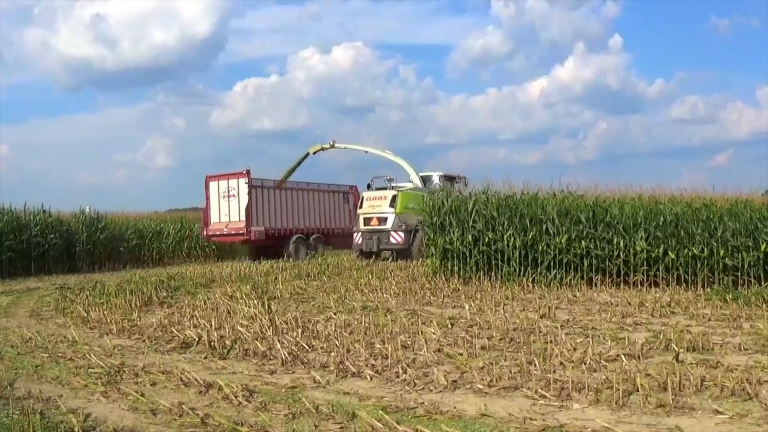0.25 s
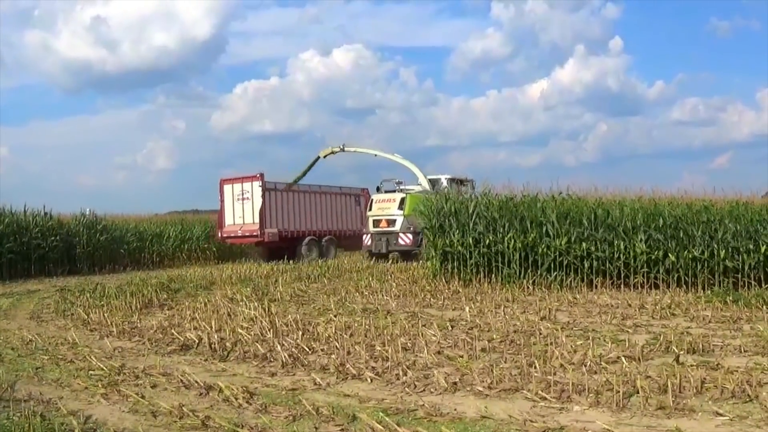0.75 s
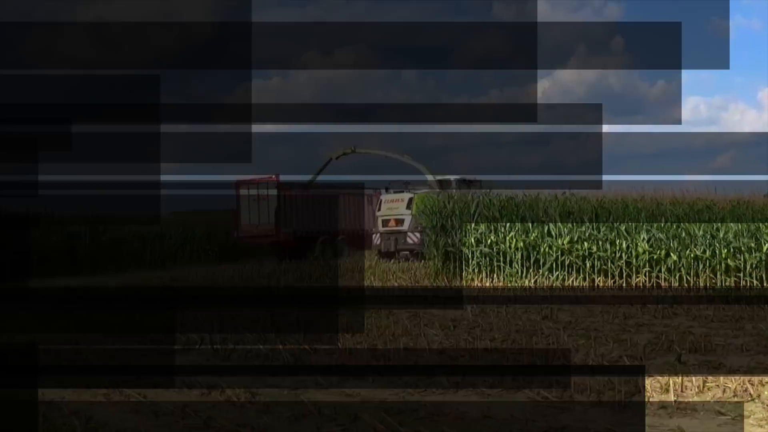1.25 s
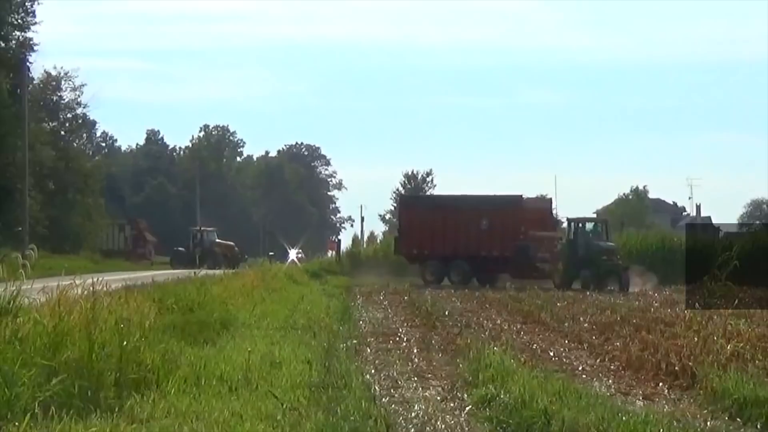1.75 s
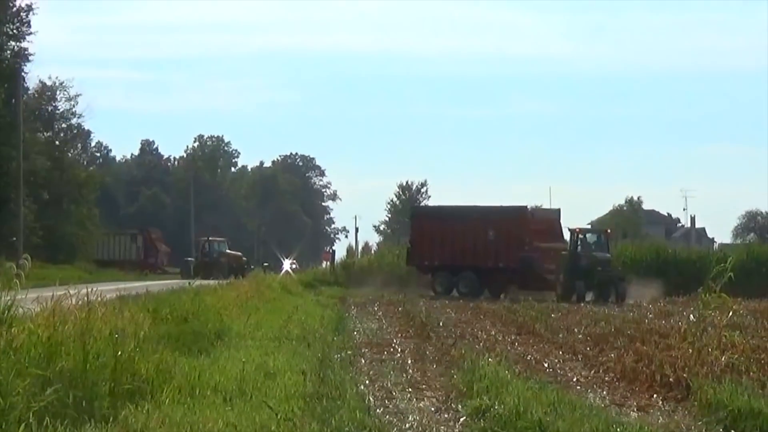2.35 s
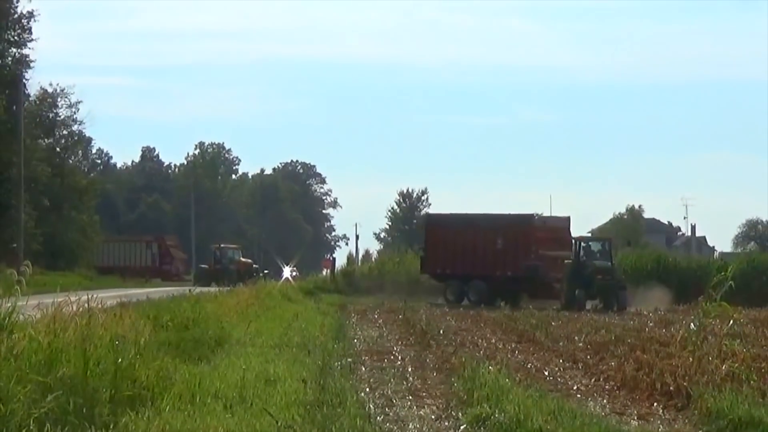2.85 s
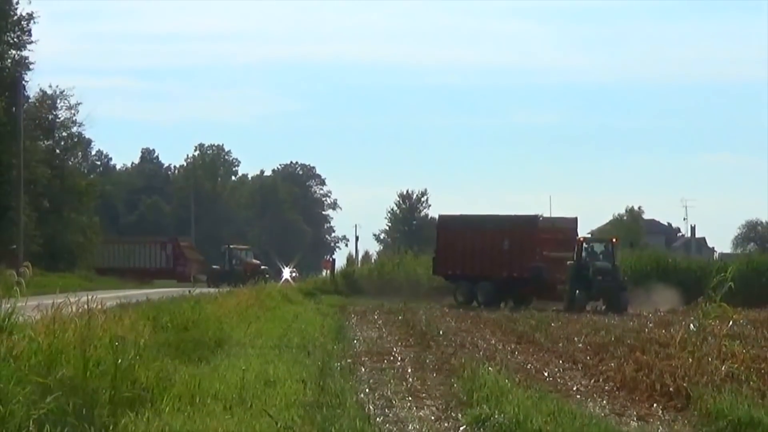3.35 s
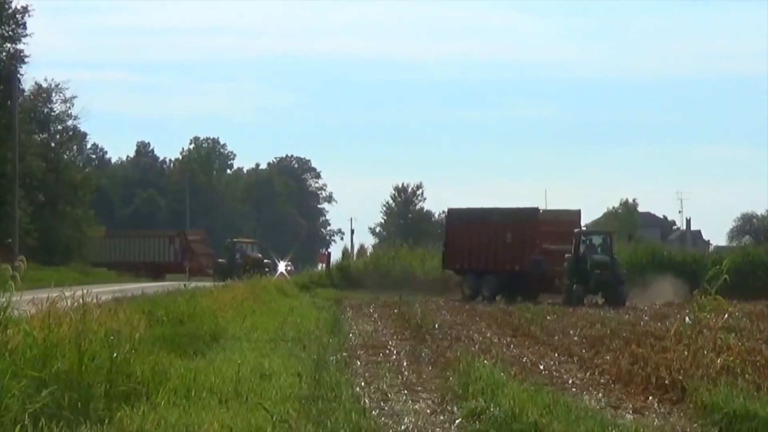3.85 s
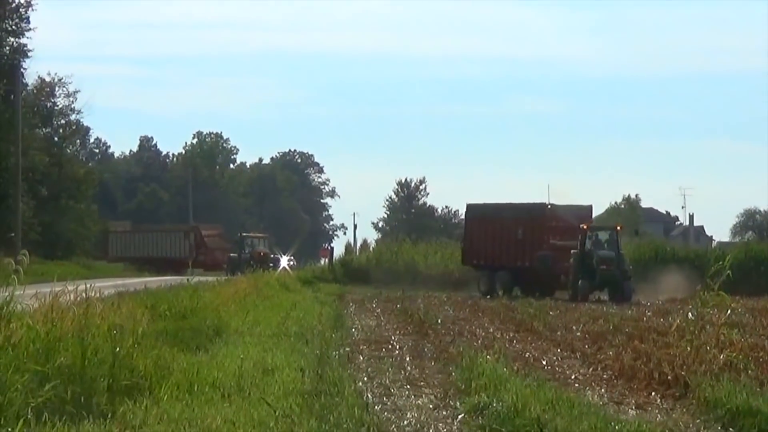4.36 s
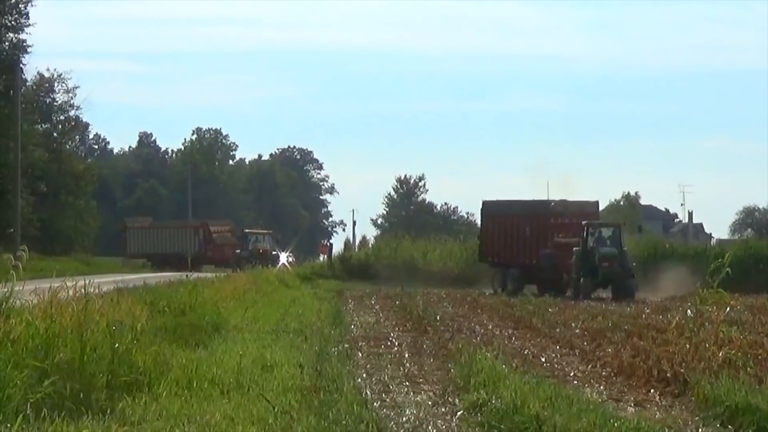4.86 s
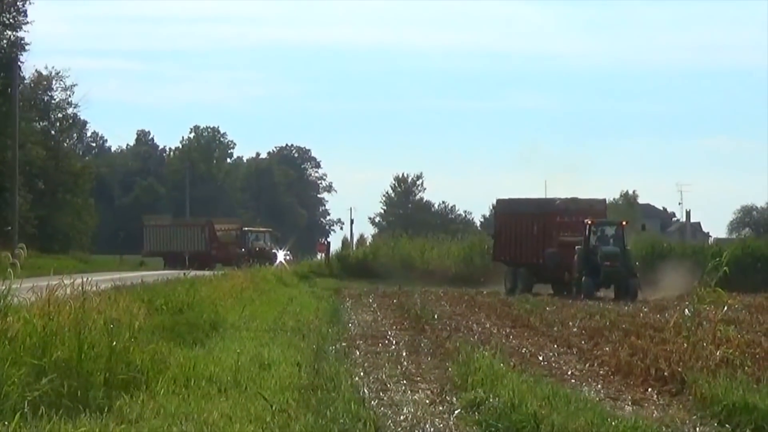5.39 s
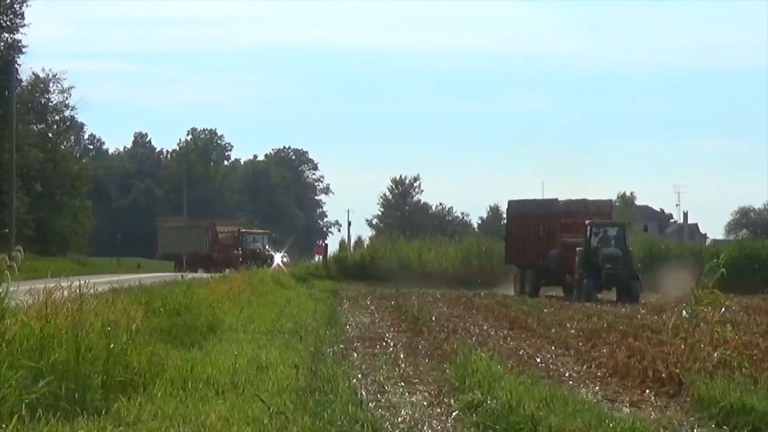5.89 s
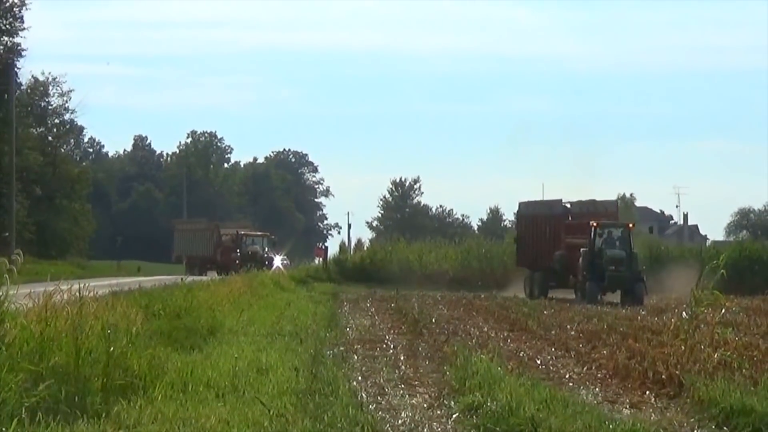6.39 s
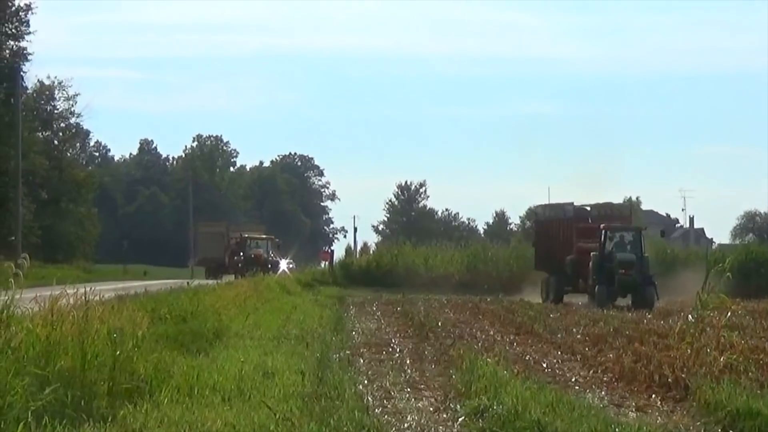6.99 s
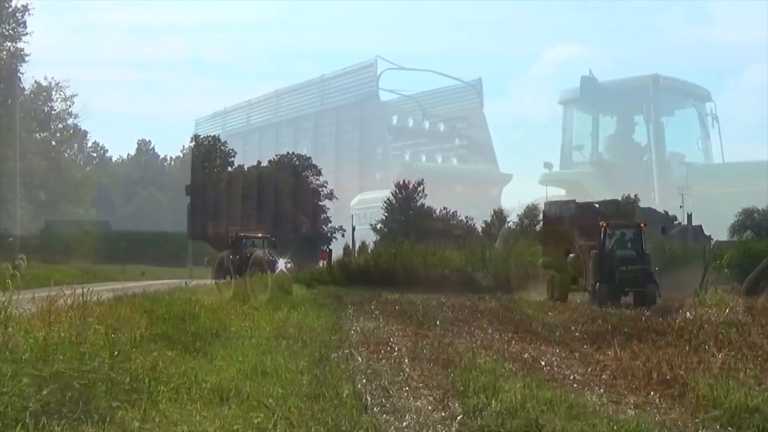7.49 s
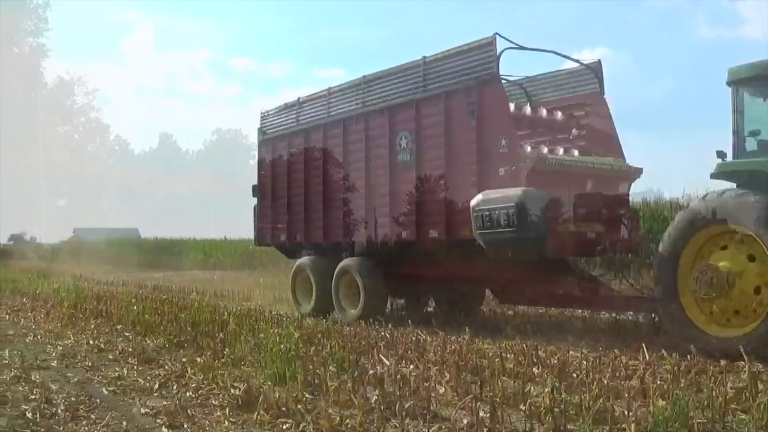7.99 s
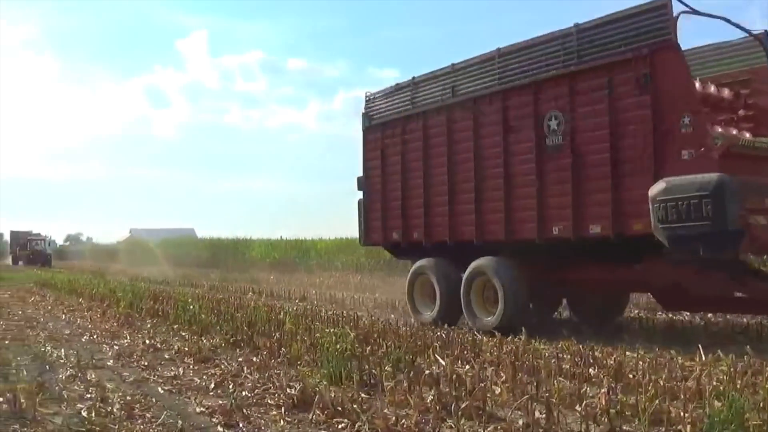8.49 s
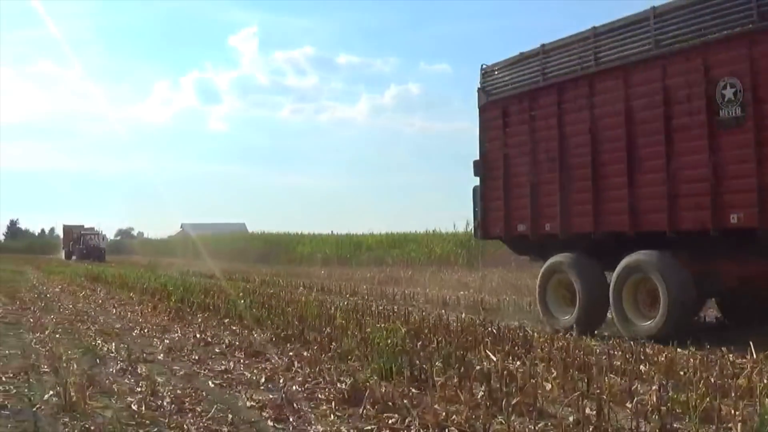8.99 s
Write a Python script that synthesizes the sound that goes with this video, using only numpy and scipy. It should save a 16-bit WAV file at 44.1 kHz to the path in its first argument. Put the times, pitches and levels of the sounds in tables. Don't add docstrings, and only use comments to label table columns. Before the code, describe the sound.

Loud chopping machine in a field, then far engines, buzzing insects and clanking wagons, finally a near tractor passing with a squeaking, rattling wagon.

```python
import sys
import numpy as np
from scipy import signal
from scipy.io import wavfile
from scipy.ndimage import uniform_filter1d

SR = 44100
rng = np.random.default_rng(int(sys.argv[2]) if len(sys.argv) > 2 else 0)


def inscribe(sig):
    pcm = np.round(np.clip(np.atleast_2d(sig).T, -1, 1) * 32767)
    wavfile.write(sys.argv[1], SR, pcm.astype(np.int16))


def gain_from_db(level_db):
    decades = np.asarray(level_db, float) / 20
    return 10 ** decades


N = 407484


def evened(x):
    return x / np.sqrt(np.mean(x ** 2) + 1e-20)


def between(ends, share):
    return ends[0] + (ends[1] - ends[0]) * share


def read(points, hz):
    f, value = np.transpose(points)
    return np.interp(np.log(hz + 1), np.log(f + 1), value)


def unroll(rows, t):
    s, *columns = np.transpose(rows)
    return [np.interp(t, s, column) for column in columns]


def add(mix, s, sound):
    part = mix[..., round(s * SR):][..., :sound.shape[-1]]
    part += sound[..., :part.shape[-1]]


def drift(size, span):
    wander = uniform_filter1d(rng.standard_normal(size), int(span), mode="wrap")
    return evened(uniform_filter1d(wander, int(span), mode="wrap"))


def stereo_noise(size, spread):
    noise = rng.standard_normal((3, size))
    return noise[0] + spread * noise[1:]


def resonate(x, hz, width):
    turn = np.exp(2j * np.pi * np.cumsum(hz * np.ones(x.shape[-1])) / SR)
    r = np.exp(-np.pi * width / SR)
    return 2 * (turn * signal.lfilter([1 - r], [1, -r], x / turn + 1e-18)).real


def ring_twice(x, hz, width, hz_2, width_2):
    return evened(resonate(resonate(x, hz, width), hz_2, width_2))


def tones(hz, multiples, levels, share, effort_db=0, waver=0.0023, flutter_db=0.5):
    turns = np.cumsum(hz * (1 + waver * drift(len(hz), 1800))) / SR
    total = np.zeros(len(hz))
    for k, db in zip(multiples, levels):
        level_db = between(db, share) + effort_db + flutter_db * drift(len(hz), 1150)
        total += np.sqrt(2) * gain_from_db(level_db) * np.sin(2 * np.pi * (k * turns + rng.random()))
    return total


def strokes(t, rate_hz, sharp, group=1, accent=0.):
    turns = np.cumsum(rate_hz * (1 + 0.0326 * drift(len(t), 6060))) / SR
    puffs = np.exp(sharp * np.cos(2 * np.pi * turns))
    return turns, puffs * (1 + accent * np.cos(2 * np.pi * turns / group))


def wide(x, width, lean_db=0):
    return gain_from_db(np.outer([.5, -.5], lean_db)) * (x + np.outer([width, -width], np.roll(x, 310)))


# f/Hz, likeness 0-1
SAME = [
    [(60, 0.89), (220, 0.8), (830, 0.83), (3110, 0.86), (11600, 0.92)],
    [(60, 1), (220, 0.99), (830, 0.91), (3110, 0.92), (11600, 0.91)],
    [(60, 0.98), (220, 0.76), (830, 0.64), (3110, 0.77), (11600, 0.47)],
]
# f/Hz, level/dB
LEAN = [
    [(60, -1.0), (220, -0.035), (830, 1.0), (3110, -0.4), (11600, 0.53)],
    [(60, 0.0), (220, -0.22), (830, 1), (3110, -1.9), (11600, 1.0)],
    [(60, 13), (220, -7), (830, -9.5), (3110, -10.5), (11600, -1)],
]
# f/Hz, phase/radians
LEAD = [(60, 0.081), (260, -0.31), (1500, 0.0071), (3500, -0.079), (6000, 0.21)]


def roar(level_db, treble_db, blend, colour_a, colour_b, view, panels=(), panel_db=5,
         patchy_db=1.5, flicker_db=1.2):
    size = len(level_db)
    frames, hz = size // 256 + 5, np.fft.rfftfreq(1024, 1 / SR)
    at = np.minimum(np.arange(frames) * 256, size - 1)
    level_db, treble_db, blend = level_db[at], treble_db[at], np.clip(blend[at], 0, 1)
    colour = gain_from_db(read(colour_a, hz)[:, None] * (1 - blend) + read(colour_b, hz)[:, None] * blend)
    for f, width, db in panels:
        peak_db = np.clip(panel_db + db / 4, 0, 12)
        colour *= gain_from_db(peak_db / (1 + (2 * (hz - f) / max(width, 50)) ** 2))[:, None]

    body = np.linalg.norm(colour[(hz > 350) & (hz < 4500)], axis=0)
    treble = np.linalg.norm(colour[(hz > 4500) & (hz < 7000)], axis=0)
    upper = np.clip((hz - 3500) / 2000, 0, 1)[:, None]
    colour *= gain_from_db(level_db) / body * (gain_from_db(treble_db) * body / treble) ** upper

    a, b, c, d, patches = rng.standard_normal((frames, 513, 5)).T
    patches = evened(uniform_filter1d(uniform_filter1d(patches, 10, 0), 12, 1))
    flicker = drift(frames, 2) * np.clip(hz / 4000, 0, 1)[:, None]

    same = np.clip(read(SAME[view], hz), -1, 1)[:, None]
    left = a + 1j * b
    right = same * left + np.sqrt(1 - same ** 2) * (c + 1j * d)
    z = np.array([left, right])
    z *= gain_from_db(np.outer([.5, -.5], read(LEAN[view], hz)))[:, :, None]
    z[0] *= np.exp(1j * read(LEAD, hz))[:, None]
    z *= colour * gain_from_db(patchy_db * patches + flicker_db * flicker)
    return 0.92 * signal.istft(z, nperseg=1024, noverlap=768)[1][:, :size]


# f/Hz, level/dB per
# Hz
HARVESTER_FROM = [(18, -69), (30, -39), (117, -12), (153, 12), (251, -15), (338, -65), (392, 8), (501, 1),
                  (611, -1.5), (1250, -0.5), (2320, -6.5), (3440, -10.5), (3900, -12), (7590, -16.5),
                  (11000, -9.5), (14300, -49.5), (22000, -120)]
HARVESTER_TO = [(18, -67), (30, -35), (65, -33.5), (245, -4.5), (364, -26), (802, -7), (1250, -14),
                (1560, -14.5), (1900, -11.5), (2690, -8.5), (3280, -15.5), (3990, -10), (6390, -14),
                (9030, -12.5), (11000, -21.5), (14300, -56.5), (22000, -120)]
# t/s, spray 0-1
SPRAY = [
    (0, 0.63),
    (.25, 0.4),
    (.45, 0.22),
    (1.0, 0.08),
    (1.15, 0.33),
    (1.33, 0.64),
    (1.7, 0.5),
]
# t/s, f/Hz, level/dB
DRUM = [
    (0, 272, -25),
    (.15, 259, -28.5),
    (.24, 237, -26),
    (.4, 248, -25.5),
    (.58, 272, -25.5),
    (.8, 256, -25),
    (1.07, 241, -22.5),
    (1.5, 256, -25),
]
# first f/Hz, f/Hz a second on, width/Hz, first level/dB, level/dB a second on
WHISTLES = [(628, 630, 8.1, -33, -31.5), (810, 890, 24, -50, -46), (1380, 1900, 9.4, -39, -43),
            (1642, 1560, 50, -30.5, -27), (2350, 2350, 28, -26.5, -31), (2656, 2660, 40, -36.5, -29),
            (3950, 4050, 190, -37, -27.5), (5350, 5430, 350, -40, -29)]


def harvester(t):
    spray = unroll(SPRAY, t)[0]
    boom_hz, boom_db = unroll(DRUM, t)
    noise = stereo_noise(len(t), 0.59)
    boom = ring_twice(noise, boom_hz, 16, boom_hz, 30)
    boom += 1.17 * ring_twice(noise, boom_hz * 1.05, 94, boom_hz * 1.01, 73)
    treble_db, colour = between((-11, -1.5), spray), between((0.52, 1), spray)
    sound = roar(-16 + 0 * t, treble_db, colour, HARVESTER_FROM, HARVESTER_TO, view=0,
                 patchy_db=1.3, flicker_db=1.0)
    for start_hz, end_hz, width, start_db, end_db in WHISTLES:
        hz = between((start_hz, end_hz), t) * (1 + .008 * drift(len(t), 3000))
        db = between((start_db, end_db), np.minimum(t, 1)) - 1.5
        sound = sound + gain_from_db(db) * ring_twice(noise, hz, width, hz, 4 * width)
    blower_hz, blower_db = 399, -41.5
    blower = tones(blower_hz + 0 * t, [1], [(blower_db, blower_db)], 0, waver=0.0091)
    return sound + gain_from_db(boom_db - 1.5) * evened(boom) + wide(blower, 0.29)


PASS_S = 7.7, 9.24
NEAR_PAN_DB = -2, -6


def passing(t):
    return np.clip((t - PASS_S[0]) / (PASS_S[1] - PASS_S[0]), 0, 1)


def knock_lean(s):
    return between(NEAR_PAN_DB, passing(s)) * (s > PASS_S[0])


# f/Hz, level/dB per Hz
NEAR_TRACTOR = [(18, -73), (30, -43), (58, -44), (85, -32), (146, -15), (270, -25), (611, -6.5), (726, -20),
                (1030, -5.5), (1280, -12), (2900, -16), (3710, -16), (4630, -4.5), (7780, -9.5),
                (10100, -16.5), (11000, -14), (14300, -54.5), (22000, -120)]
NEAR_WAGON = [(18, -84), (30, -57.5), (91, -29), (129, -31), (196, -21), (264, -17), (291, -6), (373, -33),
              (477, -11.5), (582, -21), (675, -5), (930, -15), (1860, -15), (6700, -39.5), (8800, -29),
              (10100, -29.5), (11000, -25.5), (14300, -56.5), (22000, -120)]
# f/Hz, width/Hz, level/dB
NEAR_PANELS = [(710, 48, 4), (2430, 29, -29), (2750, 25, 2), (3990, 230, -11), (4800, 200, -9),
               (11300, 580, -2)]
NEAR_ORDERS = 1, 1.5, 5 / 3, 2, 3, 4, 5, 6, 7, 8, 9, 10
# level/dB with exhaust facing away, level/dB facing the listener
NEAR_ENGINE = [(-45.5, -45), (-42.5, -46), (-42, -43), (-44, -39), (-61, -35.5), (-39, -52), (-35.5, -37.5),
               (-34.5, -39.5), (-46, -26), (-45, -35), (-33, -47), (-42, -53)]
# t/s, level/dB
LURCH = [
    (7.7, -4),
    (8.05, 0),
    (8.2, 4),
    (8.32, -1),
    (8.5, 5),
    (8.65, 4),
    (8.85, -1),
    (9.1, 5),
    (9.24, -2),
]


def near_tractor(t):
    gone = passing(t)
    turned = np.interp(t, (8.28, 8.74), [0, 1])
    pan_db = between(NEAR_PAN_DB, gone)
    rush = roar(between((-16, -18), gone), between((-10.5, -15), gone), between((0.28, 0.63), turned),
                NEAR_TRACTOR, NEAR_WAGON, view=2, panels=NEAR_PANELS, panel_db=4.5,
                patchy_db=0.5, flicker_db=0.87)
    rush *= gain_from_db(np.outer([.5, -.5], pan_db + 6.0))
    firing_hz = between((100.15, 98.3), gone)
    engine = tones(firing_hz, NEAR_ORDERS, NEAR_ENGINE, turned, waver=0.002, flutter_db=1.5)

    box_hz, box_db = between((576, 690), turned), between((-35.5, -31), turned)
    box = gain_from_db(box_db) * ring_twice(rng.standard_normal(len(t)), box_hz, 188, box_hz, 210)
    bonnet_hz, bonnet_db = between((1016, 1045), turned), between((-33.5, -37), turned)
    bonnet = gain_from_db(bonnet_db) * ring_twice(rng.standard_normal(len(t)), bonnet_hz, 130, bonnet_hz, 160)
    fan = gain_from_db(-31.5) * ring_twice(rng.standard_normal(len(t)), 2910, 250, 2910, 250)
    fan *= gain_from_db(-8 * (t - 8))
    shaken = (box + bonnet) * gain_from_db(unroll(LURCH, t)[0])
    return rush + wide(shaken + fan, 0.17, pan_db) + wide(engine, 0.0333, 0.5 * pan_db)


# t/s, peak level/dB, ring f/Hz
CHAIN = [(1.888, -8.5, 2200), (1.9095, -18, 2700), (1.9147, -9, 2190), (1.9167, -7.5, 2350),
         (1.9636, -9, 2250), (1.9658, -13.5, 2500), (1.971, -19, 2620), (1.9759, -13.5, 2060),
         (1.9790, -19, 2300), (1.9878, -11.5, 1980), (1.996, -12, 2000), (2.002, -14, 2260),
         (2.0185, -19, 2200), (2.058, -22, 2900), (2.062, -19, 2800)]


def chain():
    out, t = np.zeros(N), np.arange(4000) / SR
    link_s = 0.0036
    for s, db, hz in CHAIN:
        swell = np.sin(np.pi * np.minimum(t / link_s, 1) ** 0.87) ** 2
        ping = swell * np.sin(2 * np.pi * hz * t)
        rattle = ring_twice(rng.standard_normal(len(t)), hz * 1.18, 1000, hz * 0.86, 900)
        rattle *= gain_from_db(-15.5 - 60 * t / 0.21) * np.clip(t / link_s - .5, 0, 1)
        splash = np.diff(rng.standard_normal(len(t)), prepend=0) * gain_from_db(-18 - 60 * t / 0.035)
        add(out, s - .001, gain_from_db(db) * (ping + splash + rattle))
    return wide(out, 0.18)


# t/s, peak level/dB, strongest ring f/Hz, treble level/dB
JOLTS = [(3.4088, -29, 1119, -0.5), (4.6305, -21, 3710, 4), (4.6405, -14.5, 4200, 4), (4.658, -16, 3280, 6),
         (4.689, -22, 1720, -1), (4.9887, -29, 1464, 9), (5.046, -13.5, 1510, -14), (5.053, -15, 1530, -2),
         (5.4015, -20.5, 3304, 5), (6.790, -23.5, 5200, 8), (6.806, -22.5, 3153, 5),
         (8.3316, -7, 3343, 1.5)]
# f/Hz, level/dB
SIDE_SHEETS = [(1900, 3.5), (3150, -1), (4200, 2), (5200, 0)]


def jolts():
    out, t = np.zeros((2, N)), np.arange(6000) / SR
    rise_s, hold_s, fall_s, width_hz = 0.003, 0.0098, 0.046, 200
    hull = np.minimum(t / rise_s, 1) * gain_from_db(-30 * np.maximum(t - hold_s, 0) / fall_s)
    for s, db, hz, treble_db in JOLTS:
        grit = rng.standard_normal(len(t))
        ring = ring_twice(grit, hz, width_hz, hz, width_hz)
        sheets = evened(sum(gain_from_db(g) * resonate(grit, f, 450) for f, g in SIDE_SHEETS))
        bright = gain_from_db(-1.5) * np.diff(grit, prepend=0)
        crash = gain_from_db(db - 16.0) * (ring + gain_from_db(treble_db) * (sheets + bright)) * hull
        add(out, s - .004, wide(crash, 0.165, knock_lean(s)))
    return out


# t/s, peak level/dB, f/Hz, time to fall 60 dB/s
CLINKS = [(4.6465, -19, 3150, .03), (4.6555, -14.5, 3250, 0.054), (4.664, -23, 1750, 0.15),
          (5.3998, -20, 3300, .04), (5.4024, -25, 4550, 0.081), (5.409, -27, 3600, .09),
          (6.79, -22, 1900, .1), (6.792, -31, 5250, .08), (1.92, -25, 4700, .03), (1.969, -25, 4700, .03),
          (5.047, -25, 1492, .1), (8.76, -28, 10300, .04), (7.77, -36, 10400, .05),
          (6.8025, -23.5, 3184, 0.089), (8.158, -18.5, 2036, .15), (9.2076, -28, 2930, 0.086),
          (9.2076, -27, 4830, .12)]


def clinks():
    out, t = np.zeros((2, N)), np.arange(6000) / SR
    for s, db, hz, t60 in CLINKS:
        clink = gain_from_db(db - 60 * t / t60) * np.minimum(t / 0.0012, 1) * np.sin(2 * np.pi * hz * t)
        add(out, s, wide(clink, .1, knock_lean(s)))
    return out


# t/s, peak level/dB, ring f/Hz
PINS = [(2.1166, -36, 4880), (2.1544, -36, 4930), (2.177, -32, 3232), (2.215, -29, 3030),
        (2.3474, -35.5, 2935), (2.7994, -37.5, 4860), (2.814, -36, 4950), (2.8484, -33, 4980),
        (8.1694, -24, 2450), (8.506, -20, 2750), (8.522, -21, 2760), (8.547, -24, 3100), (8.577, -23, 2750)]


def pins():
    out, t = np.zeros((2, N)), np.arange(6000) / SR
    for s, db, hz in PINS:
        swing = np.sin(np.pi * np.minimum(t * hz / 56, 1)) ** 2
        tinkle = gain_from_db(db + 1.5) * swing * np.sin(2 * np.pi * hz * t)
        add(out, s - .002, wide(tinkle, 0.106, knock_lean(s)))
    return out


# t/s, peak level/dB, f/Hz
THUDS = [
    (2.831, -25, 433),
    (4.25, -35, 356),
]


def thuds():
    out, t = np.zeros((2, N)), np.arange(6000) / SR
    for s, db, hz in THUDS:
        turns = (t - .02) * hz
        pulse = -gain_from_db(db) * np.exp(-(turns / 0.64) ** 2) * np.cos(2 * np.pi * turns)
        add(out, s - .02, wide(pulse, .05))
    return out


# start t/s, length/s, f/Hz, level/dB
SQUEAKS = [
    (7.737, .068, 7975, -28.5),
    (8.508, .018, 7960, -33),
    (9.202, .026, 7980, -29.5),
]


def squeaks():
    out = np.zeros(N)
    for s, length, hz, db in SQUEAKS:
        t = np.arange(0, length, 1 / SR)
        whistle = np.sqrt(2) * gain_from_db(db - 60 * t) * np.sin(2 * np.pi * hz * t)
        add(out, s, whistle * signal.windows.tukey(len(t), .4))
    return wide(out, 0.23, -1)


# f/Hz, level/dB per Hz
FAR_IDLE = [(30, -6), (110, -25), (170, -6.5), (290, -15.5), (430, -9.5), (530, -2.5), (1200, -5),
            (1900, -9), (2800, -6.5), (3600, -12), (5000, -3), (6300, -8.5), (9000, -7.5), (11000, -15)]
FAR_LOADED = [(30, -38), (146, -14.5), (240, -16), (330, -20), (480, -10), (800, -8), (1150, -1),
              (1500, -3), (2760, -4.5), (4500, -9.5), (6500, -12.5), (8500, -17.5), (11000, -23)]
# t/s, firing f/Hz, effort level/dB
FIRST = [(1.7, 73.2, -3), (2.03, 74.1, 1.5), (2.44, 77.6, 0), (2.63, 75.7, -4), (2.82, 71.8, -2.5),
         (3.6, 76.1, 0), (4.01, 72, 3), (4.96, 75.5, -0.5), (5.62, 80.7, -3), (6.62, 67.54, 1.5),
         (7.5, 77, 5), (8.2, 86.8, 5)]
# t/s, firing f/Hz, throttle 0-1
SECOND = [(1.7, 80.5, 0.22), (2.0, 77.5, 0.43), (2.4, 80.9, 0.14), (3.6, 79.8, 0.08), (3.95, 76.9, 0.35),
          (4.13, 79.5, 0.34), (4.25, 85.8, 0.95), (4.5, 95, 0.95), (4.65, 100, 1.1), (4.95, 106.4, 0.93),
          (5.1, 108.9, 1), (6.5, 106.4, 0.99), (7.4, 106.1, 0.99), (8.2, 103.5, 0.88)]
# level/dB with the second engine's throttle closed, level/dB with it open
FIRST_DB = [(-54, -57.5), (-53.5, -52), (-71, -59.5)]
# level/dB at low speed, level/dB at full speed
SECOND_DB = [(-61.5, -59), (-78, -50.5)]
GEAR_DB = [(-59, -51), (-70, -45.5), (-57.5, -42)]


def far_tractors(t):
    first_hz, effort_db = unroll(FIRST, t)
    hz, throttle = unroll(SECOND, t)
    low_hz, full_hz = 77, 107.8
    speed = (hz - low_hz) / (full_hz - low_hz)
    surge_db = 0.31 * uniform_filter1d(np.gradient(hz) * SR, size=8000)
    engines = tones(first_hz, (1, 2, 3), FIRST_DB, throttle, effort_db)
    engines += tones(hz, [1], SECOND_DB[:1], speed, surge_db)
    engines += tones(hz, [1.5], SECOND_DB[1:], speed)
    gear_hz = 2.227 * hz
    engines += tones(gear_hz, (1, 2, 3), GEAR_DB, speed, 0.27 * surge_db, waver=0.0016, flutter_db=2.0)

    # a rising whine from 6.9 s, 0.8 s long
    stroke = np.clip((t - 6.9) / .8, 0, 1)
    pump = tones(between((531, 575), stroke), [1], [(-43, -43)], 0)
    engines += np.sin(np.pi * stroke ** 1.5) * pump
    rush = roar(between((-33.5, -25.5), throttle), between((-12, -11.5), throttle),
                between((0.26, 0.78), throttle), FAR_IDLE, FAR_LOADED, view=1,
                patchy_db=0.67, flicker_db=0.76)
    return rush + wide(engines, 0.04) + wide(intake(t), 0.2) + insects(t)


# t/s, boost 0-1
BOOST = [
    (1.8, 0.16),
    (2.3, 0.17),
    (3, 0),
    (3.6, 0),
    (3.85, 0.47),
    (4.1, .5),
    (4.4, 0.95),
    (4.7, 1),
    (4.95, 0.5),
    (5.3, 0),
]


def intake(t):
    boost = unroll(BOOST, t)[0]
    first_hz = unroll(FIRST, t)[0]
    second_hz, throttle = unroll(SECOND, t)
    pipe_hz, pipe_db = between((2706, 3198), boost), between((-45.5, -30.5), boost)
    first_puffs = strokes(t, first_hz, 2.2)[1]
    second_puffs = strokes(t, second_hz, 1.8)[1]
    puffs = between((first_puffs, second_puffs), .7 * throttle) * gain_from_db(.9 * drift(len(t), 400))
    hiss = puffs * rng.standard_normal(len(t))
    ring = ring_twice(hiss, pipe_hz, 750, pipe_hz * 1.03, 950)
    belt_hz, belt_db = between((628, 761), boost), between((-68, -41), boost)
    belt = gain_from_db(belt_db) * evened(resonate(rng.standard_normal(len(t)), belt_hz, 16))
    fade = np.clip((BOOST[-1][0] + 0.31 - t) / 0.36, 0, 1)
    return belt + gain_from_db(pipe_db) * ring * fade


def insects(t):
    tired_s = np.maximum(t - 6.95, 0)
    rasp_db, chirp_db = -38 - 2.14 * tired_s, -53.5 - 58 * tired_s
    puffs = 3.2 + strokes(t, 80.5, 1.3, group=3, accent=.5)[1]
    noise = stereo_noise(len(t), 0.64) * puffs
    low = signal.sosfilt(signal.butter(2, (7450, 7950), "band", fs=SR, output="sos"), noise)
    high = signal.sosfilt(signal.butter(2, (8100, 8450), "band", fs=SR, output="sos"), noise)
    turns, puffs = strokes(t, 62, 1.4)
    pitch_hz = 9110 + 600 * ((turns + .5) % 1 - .5)
    chirp = evened(puffs * np.sin(2 * np.pi * np.cumsum(pitch_hz) / SR))
    return gain_from_db(rasp_db) * evened(low + 0.47 * high) + wide(gain_from_db(chirp_db) * chirp, 0.58)


# from t/s, to t/s
CROSSFADES = [
    (1.02, 1.76),
    (7.5, 8.174),
]


def scene():
    mix = chain() + jolts() + clinks() + pins() + thuds() + squeaks()
    (a, b), (c, d) = CROSSFADES
    views = (harvester, (-1, 0, a, b)), (far_tractors, (a, b, c, d)), (near_tractor, (c, d, 10, 11))
    for view, fade in views:
        t = np.arange(round(max(fade[0], 0) * SR), min(round(fade[3] * SR), N)) / SR
        add(mix, t[0], view(t) * np.interp(t, fade, [0, 1, 1, 0]))
    return mix


def band_limit(x):
    return signal.sosfilt(signal.butter(12, 12190, fs=SR, output="sos"), x)


def record(dry):
    taps = signal.firwin(1535, 10985, window=("kaiser", 8), fs=SR)
    thin = signal.sosfilt(signal.butter(2, 48, "high", fs=SR, output="sos"), dry)
    mix = signal.oaconvolve(thin, taps[None], "same")
    return band_limit(mix)


dry = scene()
out = record(dry)
inscribe(out)
```